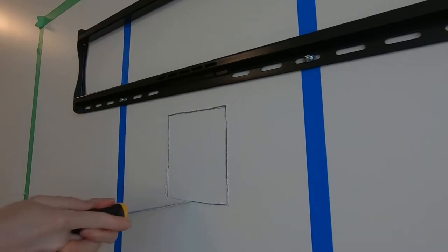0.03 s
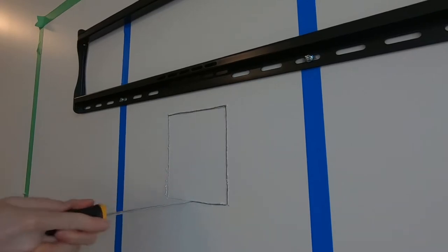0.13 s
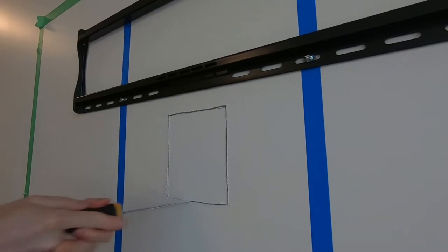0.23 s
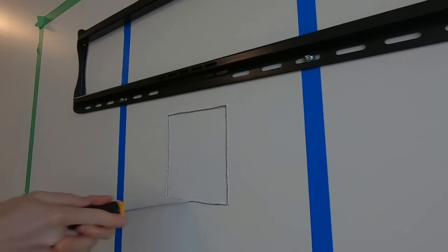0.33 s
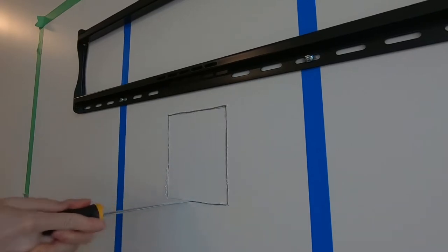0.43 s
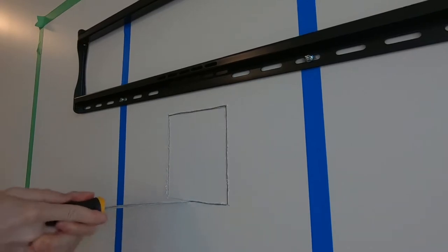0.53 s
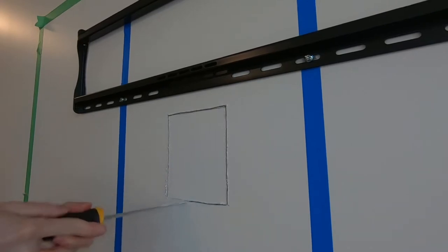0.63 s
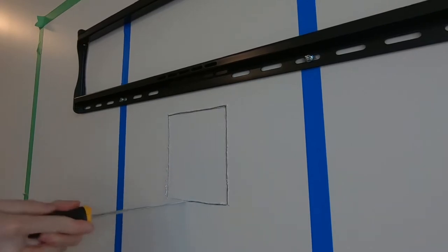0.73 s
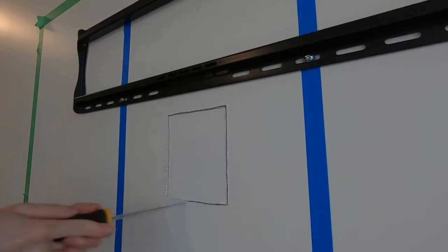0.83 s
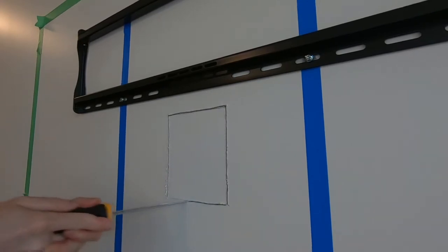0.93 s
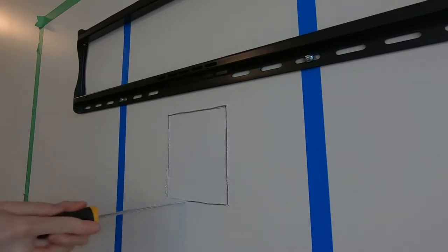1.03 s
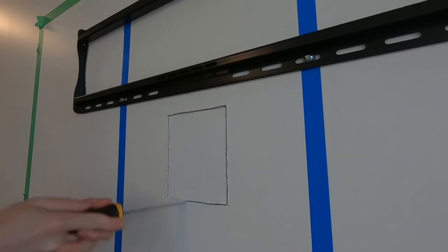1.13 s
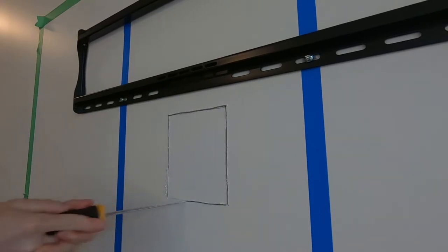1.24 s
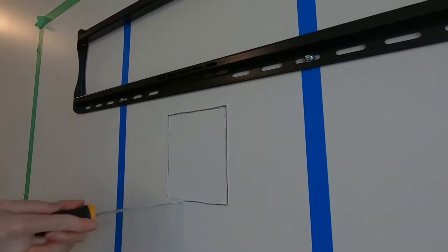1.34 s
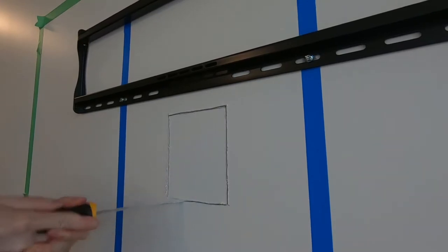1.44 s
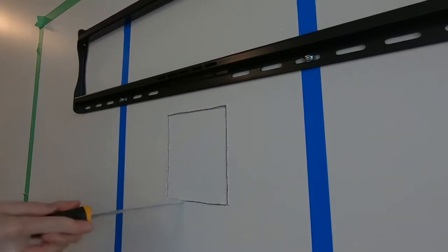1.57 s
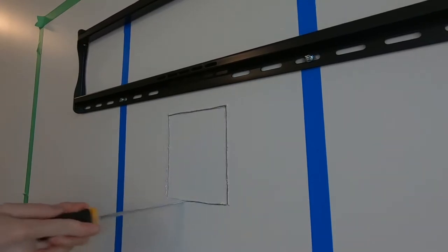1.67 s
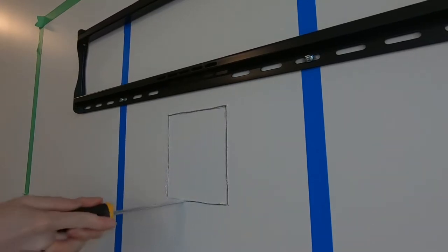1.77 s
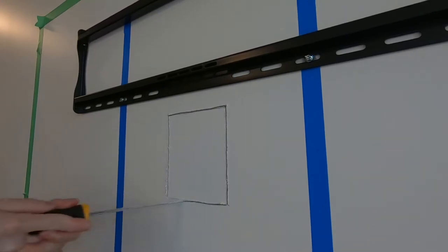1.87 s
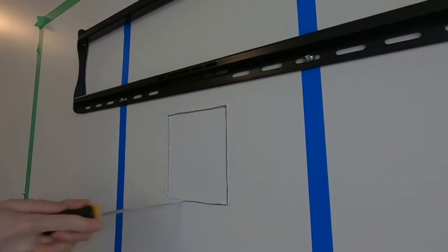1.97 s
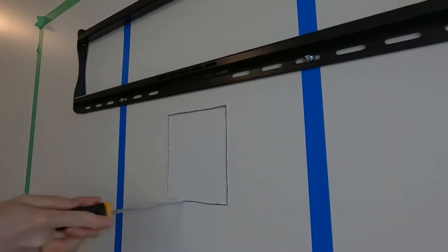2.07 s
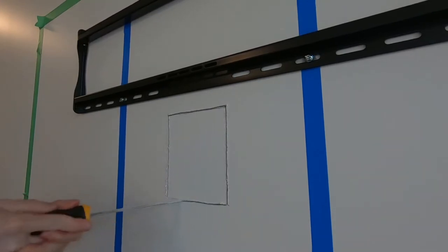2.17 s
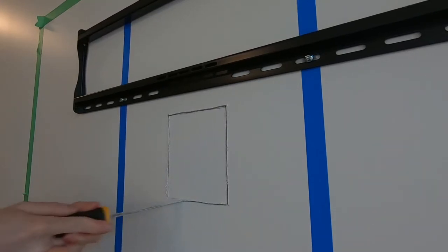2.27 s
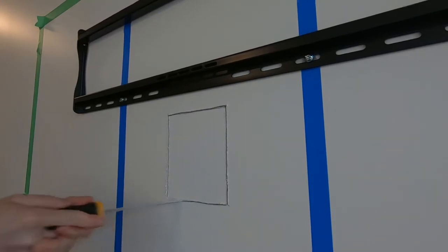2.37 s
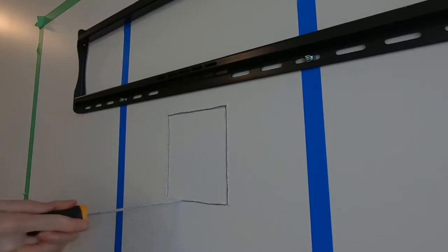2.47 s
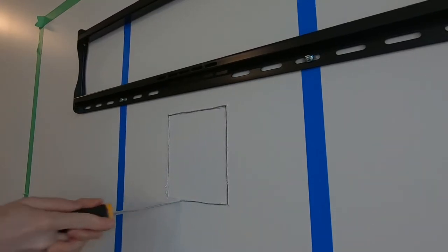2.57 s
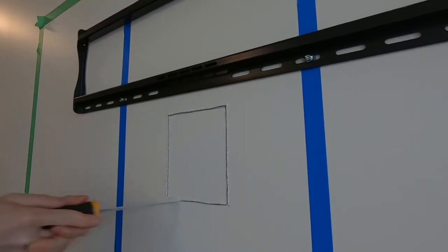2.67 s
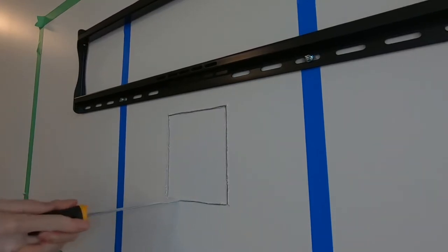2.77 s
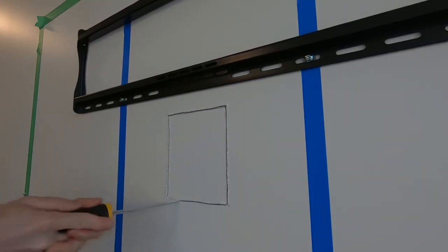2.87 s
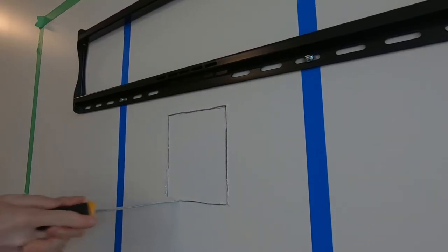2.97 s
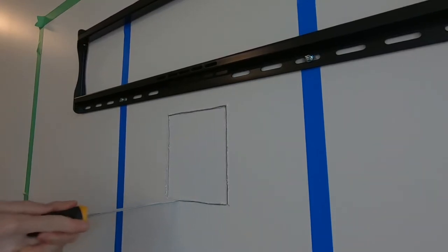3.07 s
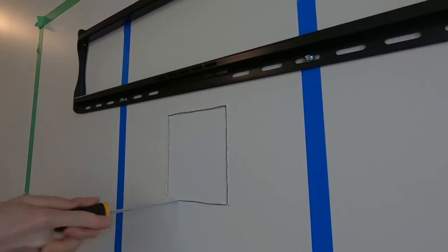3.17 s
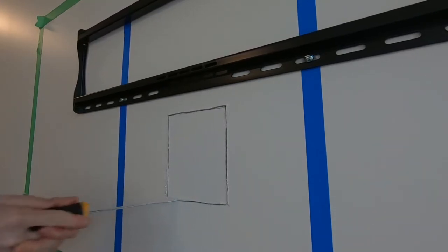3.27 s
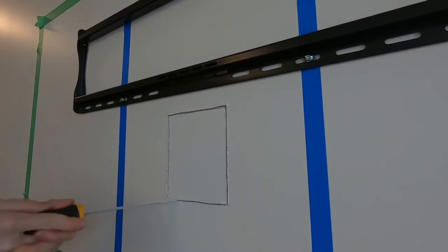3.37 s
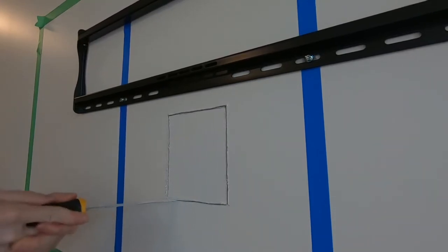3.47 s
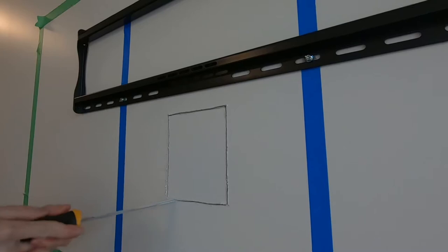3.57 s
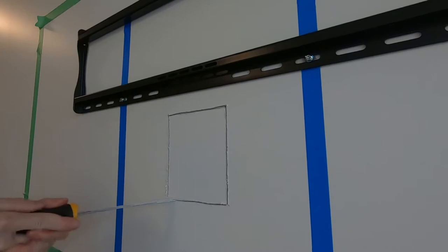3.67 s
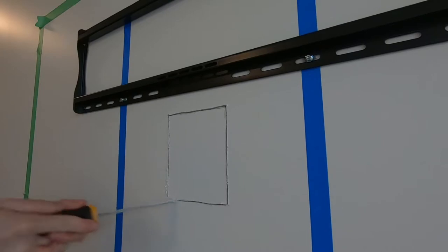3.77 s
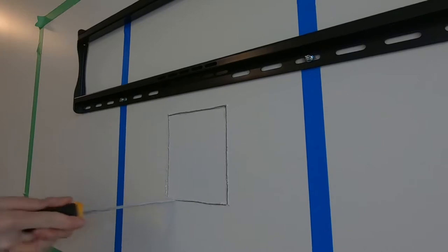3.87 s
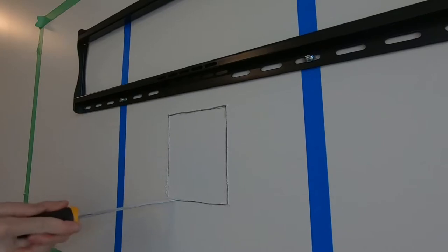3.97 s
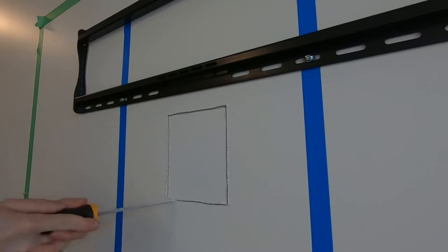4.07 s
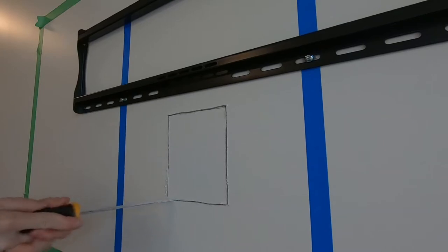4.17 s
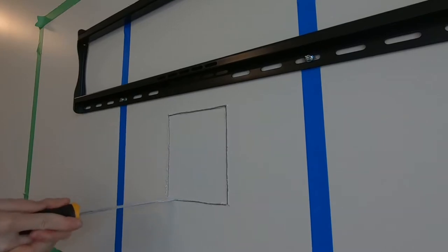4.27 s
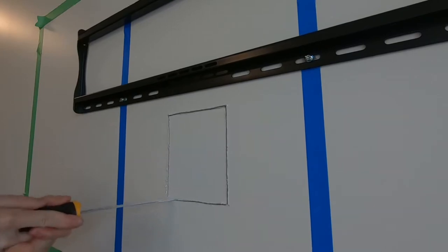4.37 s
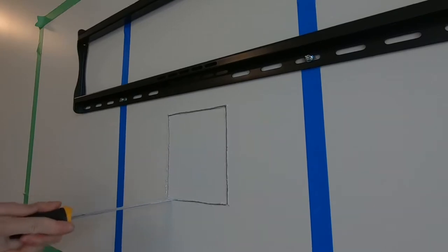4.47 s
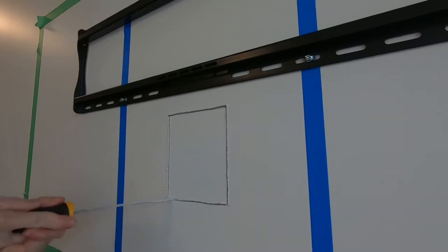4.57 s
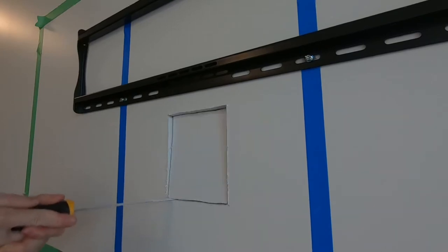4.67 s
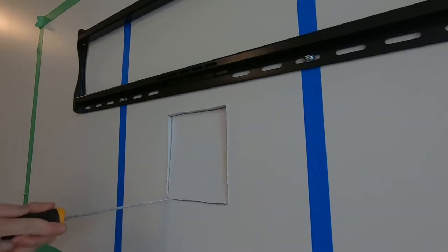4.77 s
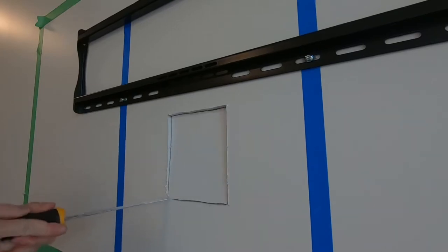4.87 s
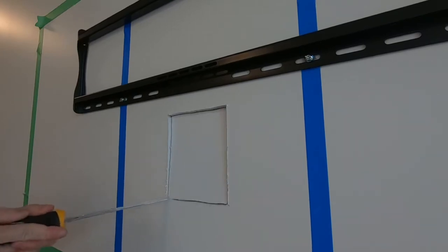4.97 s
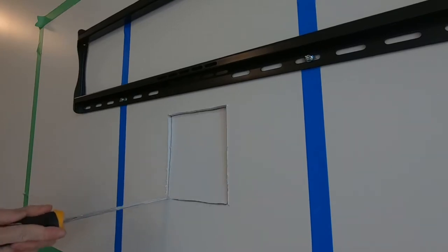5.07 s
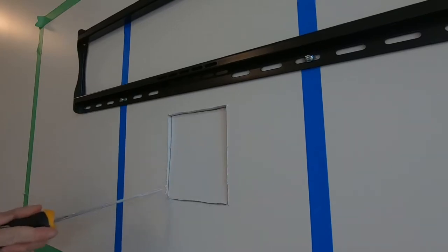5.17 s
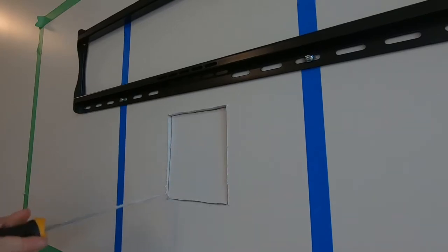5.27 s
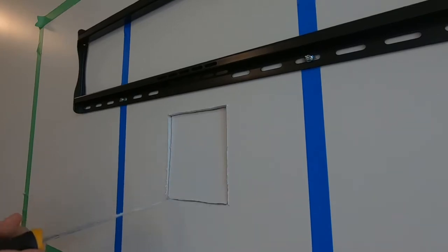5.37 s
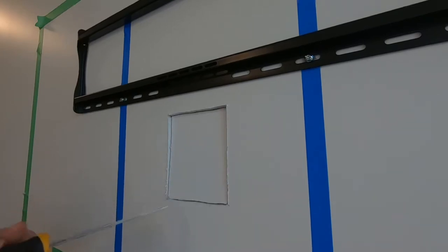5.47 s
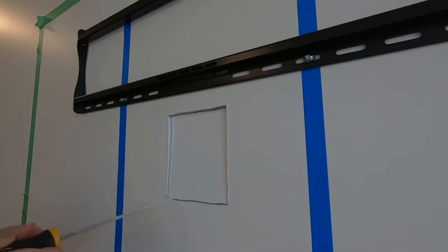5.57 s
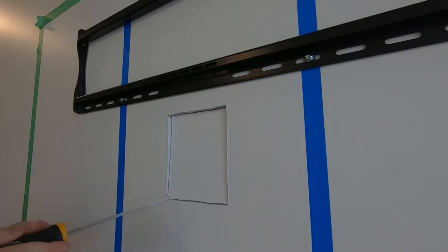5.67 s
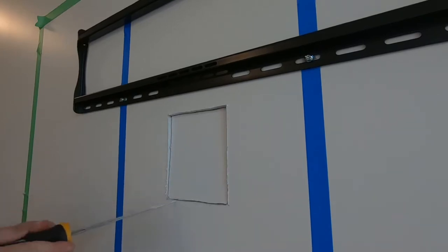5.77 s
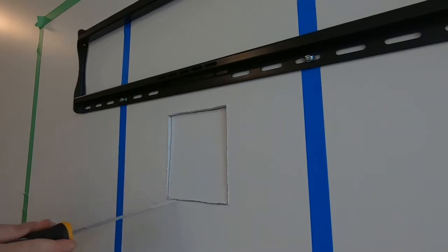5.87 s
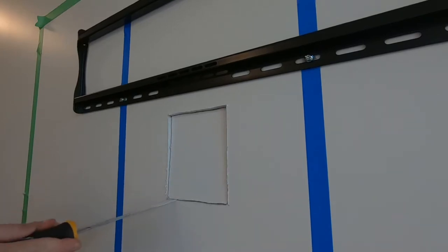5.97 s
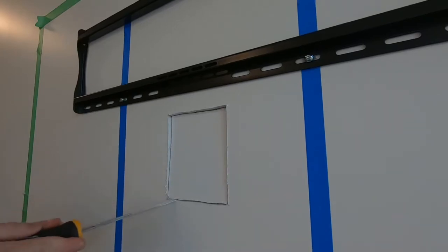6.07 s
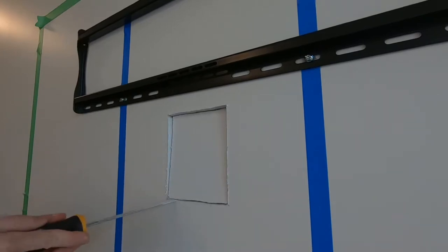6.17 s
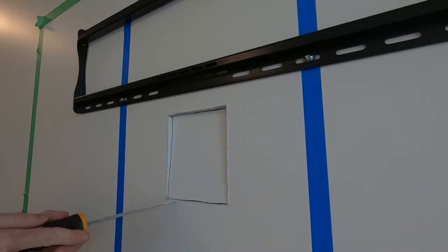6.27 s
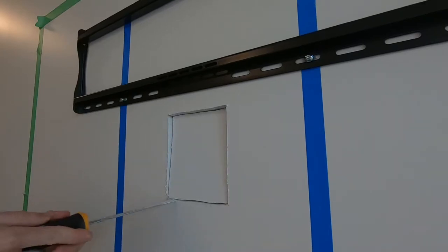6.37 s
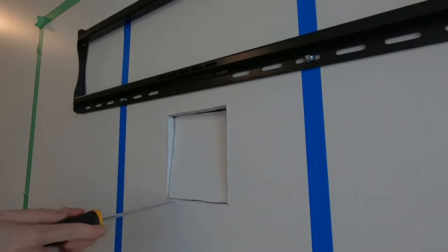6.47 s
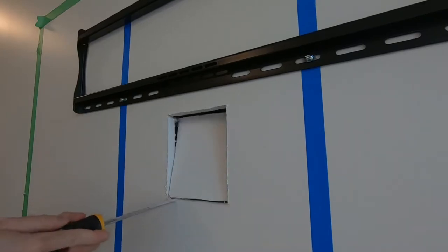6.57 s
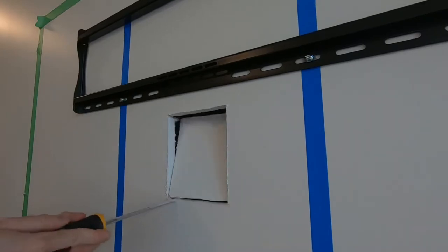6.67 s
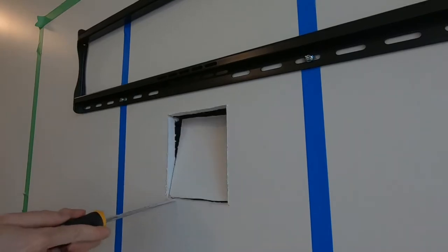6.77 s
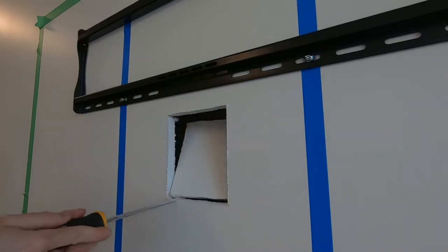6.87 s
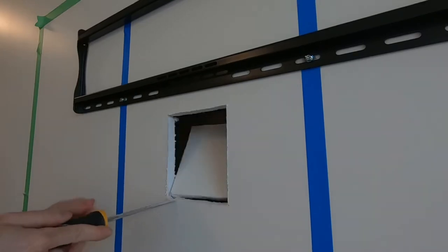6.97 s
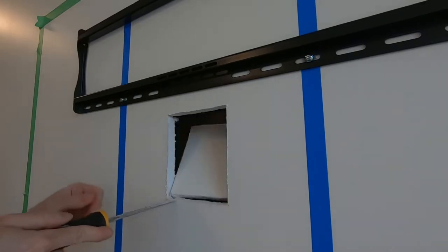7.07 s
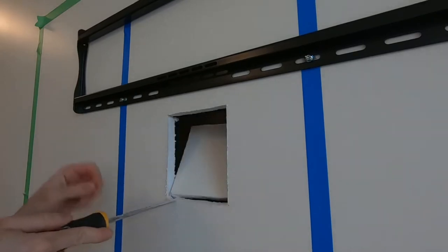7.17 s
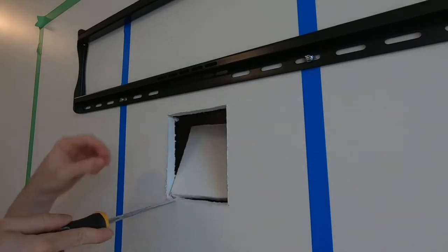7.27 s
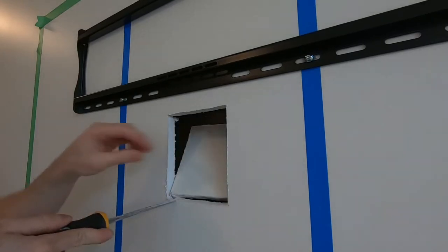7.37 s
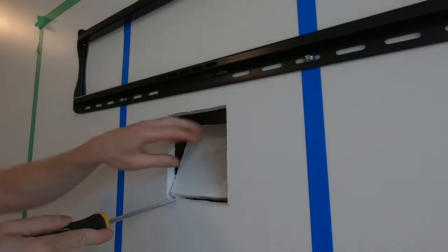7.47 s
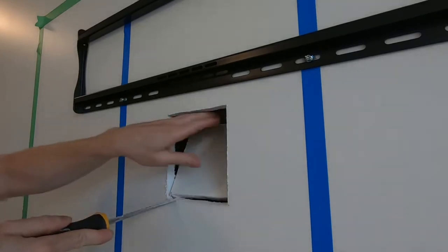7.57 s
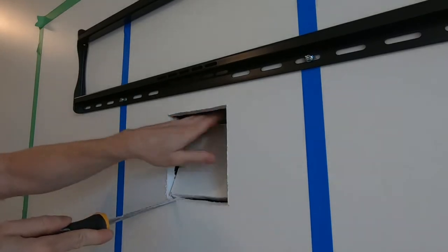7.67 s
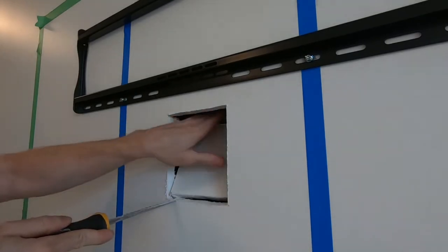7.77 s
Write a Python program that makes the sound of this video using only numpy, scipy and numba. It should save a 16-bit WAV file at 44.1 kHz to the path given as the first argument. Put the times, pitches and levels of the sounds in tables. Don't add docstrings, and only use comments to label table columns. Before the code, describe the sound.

Close up in a bare room, a small hand saw chews through plasterboard in rapid alternating strokes, gritty rasps with low hollow wall thumps and a slight metallic ring. After about four and a half seconds it fades to near quiet. Faint prying scrapes follow, then one harder scrape with a dull knock as the piece gives way, small rubs, and two light finger taps with crumbs over a low hum.

```python
import sys
import numpy as np
from scipy import signal
from scipy.fft import rfft, irfft
from scipy.io import wavfile
from scipy.ndimage import uniform_filter1d
from numba import njit

SR = 44100
rng = np.random.default_rng(int(sys.argv[2]) if len(sys.argv) > 2 else 0)


def wav_out(sig):
    wavfile.write(sys.argv[1], SR, np.round(np.clip(np.atleast_2d(sig).T, -1, 1) * 32767).astype(np.int16))


def elevation(decibels):
    levels = np.asarray(decibels, float)
    return 10 ** (levels / 20)


N = 344421

# (middle [s], length [s], rasp [dB], panel thump [dB], cavity boom [dB])
PUSHES = [(-0.01, .05, -35, -17, -18), (.22, .116, -37.5, -15.5, -21), (.795, .145, -35.5, -22.5, -18),
          (1.073, .127, -33.5, -18, -22), (1.672, .101, -35, -16, -23), (1.965, .109, -32, -18.5, -22),
          (2.24, .134, -35, -21.5, -20), (2.527, .144, -32, -19, -24), (2.818, .133, -32, -20, -23),
          (3.103, .106, -35.5, -19, -25), (3.741, .128, -34.5, -20.5, -26), (4.014, .121, -34.5, -21, -21),
          (4.284, .104, -54, -37, -32)]
PULLS = [(.055, .072, -46, -19, -20), (.347, .122, -40, -20, -27), (.659, .082, -41.5, -23, -20),
         (.936, .104, -42.5, -27, -32), (1.211, .14, -40, -18.5, -28), (1.532, .076, -44, -33, -26),
         (1.826, .132, -38, -21.5, -24), (2.1, .18, -40.5, -20, -45), (2.37, .133, -39.5, -21, -25),
         (2.649, .127, -39.5, -15.5, -35), (2.955, .14, -40.5, -21.5, -24),
         (3.241, .187, -40.5, -20.5, -33), (3.573, .182, -49, -33.5, -34), (3.842, .107, -38.5, -18.5, -27),
         (4.134, .114, -44, -28, -38), (4.446, .1, -48, -30, -31), (4.63, .2, -56, -38, -41),
         (4.701, .078, -45, -37.5, -36), (4.98, .12, -58, -64, -55), (5.12, .3, -72, -80, -75)]
# (middle [s], length [s], rasp [dB], paper re rasp [dB], dust re rasp [dB])
LEVER = [
    (4.928, .05, -53, -6, -4),
    (5.84, .1, -71, -5, -12),
    (5.92, .25, -68, -3, -12),
    (6.033, .13, -56, -7, -19),
    (6.145, .16, -51, -8, -15),
    (6.362, .054, -47, -8, -9.5),
    (6.419, .16, -35.5, -10, -13.5),
    (6.778, .238, -58, -6, -5.5),
    (6.89, .091, -70, 9, 10.5),
    (6.938, .041, -55, -12, -7),
]
# (middle [s], length [s], thump [dB],
# cavity boom [dB])
KNOCKS = [(5.17, .11, -90, -54), (5.84, .25, -53, -61), (6.046, .196, -41.5, -49), (6.156, .17, -38, -48),
          (6.385, .07, -33, -42), (6.44, .22, -20, -29), (6.692, .19, -44, -55), (6.81, .192, -45.5, -43),
          (6.95, .114, -32, -37), (7.049, .13, -42, -52), (7.46, .17, -61, -74)]
# (time [s], peak [dB], thud re peak [dB], crack centre [Hz])
TICKS = [
    (1.506, -36, -5, 3500),
    (1.9405, -24, 4, 3300),
    (4.917, -44, -9, 4500),
    (5.8225, -54, 3, 3400),
    (5.857, -60, -3, 3300),
    (6.031, -44, 5, 2600),
    (6.357, -36, 6, 4700),
    (6.936, -42, 14, 4200),
    (7.5196, -39, -9, 5000),
    (7.5336, -33, -9, 5200),
]
# (middle [s], length [s], level [dB])
CRUMBS = [
    (7.525, .02, -58),
]

# (centre [Hz], width [Hz], level [dB])
CAVITY = [(22, 5.9, -11.5), (36, 34, -1), (50.6, 9.7, 2.5), (72.7, 7.7, -2.5)]
PANEL = [(97.8, 6.9, -5.5), (132, 30, -1.5), (160.2, 21.3, 1.5), (206.8, 75, -5), (270.4, 42.5, -11.5),
         (304.5, 32, -17.5)]
LOOSE_PIECE = [(98, 18, -3.5), (135, 25, 0.5), (166, 24.4, -0.5), (215, 30, -3.5), (274, 19, -7)]
BOARD = [(278.7, 40, 0.5), (362.4, 52, -4), (457.6, 26.5, -5), (528.2, 30, -9.5), (636, 71, -9),
         (732, 67, -17.5)]
BLADE_IN_CUT = [(1259, 49, 1.5), (1535, 31, -3.5), (1754, 30, -4.5), (1877, 180, 2), (2320, 46, -0.5),
                (2497, 35, 0.5), (2736, 45, -3.5), (2920, 66, -1.5), (4640, 90, -14), (5050, 60, -15.5),
                (5680, 110, -6), (6530, 90, -20.5), (8670, 110, -18.5)]
BLADE_FREE = [(1530, 50, 2), (1860, 90, 0), (2251, 65, -0.5), (2560, 60, 1), (3064, 32, -1.5),
              (3910, 50, -2.5), (4713, 70, 5), (5460, 80, -8), (6260, 60, -14), (7100, 60, -11)]
PAPER = [(2950, 400, -2.5), (3350, 450, -0.94), (3896, 370, -2.5)]
KERF = [(1900, 120, 4.5)]
# (frequency [Hz], density [dB per Hz])
RASP = [(410, -37), (700, -3), (868, -1), (1120, -3.5), (1270, 0), (1620, -1.5), (1840, -4), (2060, 0),
        (3760, -6), (4360, -11), (5500, -20.5), (7150, -44.5), (12100, -120)]
DUST = [(3500, -29.5), (4400, -4), (5300, -5.5), (5900, -7), (7600, -9), (9000, -8), (10300, -15.5),
        (11500, -29), (14900, -30), (20000, -90)]
CRUMB = [(600, -14), (1500, -5.5), (1660, -18), (2380, -6), (3340, -16), (3580, -7.5), (7250, -2),
         (11500, -24), (14900, -54), (22000, -120)]
HOUSE = [(12, -29.5), (20, 3.5), (44, -1), (86, -11.5), (125, -9.5), (207, -12.5), (271, -18), (540, -31.5),
         (784, -18), (1050, -30), (1440, -29), (8580, -45.5), (11500, -57), (14900, -87), (22000, -120)]
# (centre [Hz], width [Hz], level before load change [dB], level after [dB])
HUM = [(54, 2.5, -67, -78), (108, 3.5, -67, -84), (185, 70, -88, -69), (280, 24, -84, -68)]
# (frequency [Hz], side re mid [dB])
APART = [(60, -41.5), (110, -35.5), (190, -48), (340, -15.5), (610, -4), (1090, -2.5), (1940, -4.5),
         (3460, -9.5), (6180, 0.5), (11000, 4.5)]

# (lag [s], stretch of length [ratio], after-ring [dB], after-ring fade [dB/s])
AS_RASP = (.001, 1.01, -1.5, 57)
AS_TEAR = (.001, 1.05, -10, 55)
AS_DUST = (.004, 1.12, -5, 62)
AS_THUMP = (.018, 1.45, -6, 60)
AS_BOOM = (.041, 2.3, -8, 42)
LEVER_RASP = (.001, 1.01, -6.5, 58)
LEVER_DUST = (.001, 1.01, -4, 95)
KNOCK_THUMP = (.001, 1.01, -15.5, 80)
KNOCK_BOOM = (.019, 1.3, -4, 130)
CRUMBS_FALL = (.001, 1.01, 8, 70)

RISE_SHARE, LEVER_RISE_SHARE = .44, .33
TEETH_SLOW_HZ, TEETH_FAST_HZ = 108, 138
PUSH_TOP_HZ = 1800
TEAR_PUSH_DB, TEAR_PULL_DB, DUST_PUSH_DB, DUST_PULL_DB = -8, 4.5, -14, -11.3
CLOGGED_DB, CLEARS_S = -5.5, 1.1
SAGS_S, BRUSH_TEAR_DB, BRUSH_DUST_DB = 4.6, 3.5, 4.5
LOOSE_S = 5.6
ROOM_T60_S, ROOM_DAMP, ROOM_DB = 0.59, 0.4, -13.5
HOUSE_DB, HUM_CHANGE_S = -59, 6.2
PORTS_DB = -39


def sawing():
    rows = np.array(PUSHES + PULLS)
    mid_s, _, rasp_db, thump_db, boom_db = rows.T
    pull = np.arange(len(rows)) >= len(PUSHES)
    brush = mid_s > SAGS_S
    tear_db = np.where(pull, TEAR_PULL_DB, TEAR_PUSH_DB) + BRUSH_TEAR_DB * brush
    dust_db = np.where(pull, DUST_PULL_DB, DUST_PUSH_DB) + BRUSH_DUST_DB * brush
    dust_db = dust_db + CLOGGED_DB * np.exp(-mid_s / CLEARS_S)

    def follow(db, law):
        return swell(rows, db, RISE_SHARE, law)

    speed = np.minimum(elevation(2 * follow(0 * mid_s, AS_THUMP)), 1)
    teeth_hz = TEETH_SLOW_HZ + (TEETH_FAST_HZ - TEETH_SLOW_HZ) * speed
    return (follow(rasp_db, AS_RASP), follow(rasp_db + tear_db, AS_TEAR), follow(rasp_db + dust_db, AS_DUST),
            follow(thump_db, AS_THUMP), follow(boom_db, AS_BOOM), teeth_hz)


def teeth(teeth_hz):
    phase = np.cumsum(teeth_hz * (1 + .1 * walk(120)) / SR)
    tooth = phase.astype(int)
    bite = elevation(3.47 * rng.standard_normal(N)[tooth])
    push = heard(bite * np.diff(tooth, prepend=0)) + .5 * rng.standard_normal(N)
    push = signal.sosfilt(signal.butter(2, PUSH_TOP_HZ, fs=SR, output="sos"), push)
    gate = 1.0 + np.minimum(bite, 1.7) * np.exp(-(phase % 1) / 0.51)
    return push, gate


def saw(rasp_db, tear_db, dust_db, blade, gate, blade_db):
    burst = gate * (rng.standard_normal(N) + .35 * heard(grains(2500, spread_db=3.0)))
    chatter = gate * rng.standard_normal(N) * elevation(1.15 * rasp_db)
    steel = np.zeros(N)
    for hz, width, db in blade:
        mode = ring(chatter * elevation(3.5 * walk(14)), [(hz, width, db)])
        steel += ring(mode, [(hz, 5 * width, 0)]) * np.sqrt(width)
    rasp = colour(burst * elevation(rasp_db + 2.0 * walk(40)), RASP)
    rasp = rasp + ring(rasp, KERF) * np.sqrt(KERF[0][1])
    tear = np.zeros(N)
    for k, mode in enumerate(PAPER):
        tear += (-1) ** k * ring(np.roll(burst, 900) * elevation(tear_db + 3.5 * walk(9)), [mode])
    tear = ring(tear, PAPER)
    dust = colour(burst * elevation(dust_db), DUST)
    return (layer(rasp, rasp_db - 1.5) + layer(steel, rasp_db + blade_db)
            + layer(tear, tear_db - 7) + layer(dust, dust_db))


def wall(push, rasp_db, panel_db, cavity_db):
    loose = np.arange(N) > LOOSE_S * SR
    panel = np.zeros(N)
    for modes, db in ((PANEL, panel_db - 100 * loose), (LOOSE_PIECE, panel_db - 100 * ~loose)):
        panel += layer(ring(push * elevation(db), modes), db)
    board_db = 0.84 * rasp_db + 0.23 * panel_db - 2.2 * loose
    board = elevation(3.2) * layer(ring(push * elevation(board_db), BOARD), board_db)
    boom = ring((push + rng.standard_normal(N)) * elevation(cavity_db), CAVITY)
    return panel + board, layer(boom, cavity_db)


def levering():
    rows, knocks = np.array(LEVER), np.array(KNOCKS)
    _, _, rasp_db, paper_db, dust_db = rows.T

    def follow(table, db, law):
        return swell(table, db, LEVER_RISE_SHARE, law)

    return (follow(rows, rasp_db, LEVER_RASP), follow(rows, rasp_db + paper_db, LEVER_DUST),
            follow(rows, rasp_db + dust_db, LEVER_DUST), follow(knocks, knocks[:, 2], KNOCK_THUMP),
            follow(knocks, knocks[:, 3], KNOCK_BOOM))


def ticks():
    cracks, thud = np.zeros(N), np.zeros(N)
    shape = rng.standard_normal((len(TICKS), 400)) * np.exp(-np.arange(400) / SR / 0.00086)
    shape[:, 0] = 5
    for (s, db, thud_db, hz), burst in zip(TICKS, shape):
        i = int(s * SR)
        band = signal.butter(3, [.6 * hz, min(1.2 * hz, 9000)], "band", fs=SR, output="sos")
        crack = signal.sosfilt(band, burst)
        cracks[i:i + 400] += elevation(db) * crack / np.abs(crack).max()
        thud[i] += elevation(db + thud_db) * (thud_db > 0)
    unit = np.abs(ring(np.eye(1, 4000)[0], PANEL)).max()
    return cracks + elevation(-7) * ring(thud, PANEL) / unit


def crumbs():
    fall = .4 * heard(grains(1500, spread_db=2.0)) + rng.standard_normal(N)
    return heard(colour(fall, CRUMB)) * elevation(swell(CRUMBS, [CRUMBS[0][2]], .3, CRUMBS_FALL))


@njit
def walls(x, lags, gain, damp):
    line, soft, out = np.zeros((8, 4096)), np.zeros(8), np.zeros((2, len(x)))
    for i in range(len(x)):
        total = 0.
        for k in range(8):
            soft[k] += (1 - damp) * (gain[k] * line[k, (i - lags[k]) & 4095] - soft[k])
            total += soft[k]
            out[k % 2, i] += soft[k]
        for k in range(8):
            line[k, i & 4095] = x[i] + soft[k] - total / 4
    return out


def house():
    after = np.clip((np.arange(N) / SR - HUM_CHANGE_S) / .3, 0, 1)

    def distant():
        level_db = HOUSE_DB - 7.5 + 2.9 * after + 1.3 * walk(3.95)
        return heard(colour(rng.standard_normal(N), HOUSE)) * elevation(level_db)

    rumble, other = distant(), distant()
    hum = np.zeros(N)
    for hz, width, db, late_db in HUM:
        tone = ring(ring(rng.standard_normal(N), [(hz, 5 * width, 0)]), [(hz, width, 0)])
        hum += elevation(db + (late_db - db) * after) * heard(tone)
    return np.array([rumble + hum, other])


def swell(rows, db, rise, law):
    lag_s, stretch, ring_db, fade_db_s = law
    power = np.zeros(N)
    for (s, length, *_), peak_db in zip(rows, db):
        span = length * stretch
        i = np.arange(max(int((s - 2 * span) * SR), 0), min(int((s + 2 * span) * SR), N))
        t = i / SR - s - lag_s
        side_s = np.where(t < 0, rise, 1 - rise) * span
        power[i] += elevation(2 * peak_db) * np.exp(-(2 * t / side_s) ** 2)
    keep = elevation(-2 * fade_db_s / SR)
    after = signal.lfilter([1 - keep], [1, -keep], power, zi=[power[0]])[0]
    return 10 * np.log10(power + elevation(2 * ring_db) * after + 1e-12)


def heard(x):
    return x / np.sqrt(np.mean(x ** 2) + 1e-18)


def layer(x, db):
    return heard(x) * np.sqrt(np.mean(elevation(db) ** 2))


def colour(x, points):
    hz, db = np.transpose(points)
    size = 4096
    bins_hz = np.arange(size // 2 + 1) * SR / size
    cep = irfft(np.interp(np.log(bins_hz + 1), np.log(hz), db) * np.log(10) / 20)
    cep[1:size // 2] *= 2
    cep[size // 2 + 1:] = 0
    return signal.fftconvolve(x, irfft(np.exp(rfft(cep))))[:N]


def ring(x, modes):
    out = np.zeros(len(x))
    for k, (hz, width, db) in enumerate(modes):
        mode = signal.lfilter(*signal.iirpeak(hz, hz / width, SR), x)
        out += (-1) ** k * elevation(db) * mode / np.sqrt(width)
    return out


def grains(rate_hz, spread_db):
    chance = rng.random((3, N))
    size = elevation(-spread_db * np.log(chance[2] + .004))
    return (chance[0] < rate_hz / SR) * np.sign(chance[1] - .5) * size


def walk(rate_hz):
    k = int(SR / rate_hz)
    steps = np.repeat(rng.standard_normal(N)[:N // k + 1], k)[:N]
    return heard(uniform_filter1d(uniform_filter1d(steps, k), k))


def scene():
    *cut, teeth_hz = sawing()
    pry = levering()
    rasp_db, _, _, panel_db, cavity_db = np.maximum(cut, pry)
    push, gate = teeth(teeth_hz)
    thump, boom = wall(push, rasp_db, panel_db, cavity_db)
    blade = saw(*cut[:3], BLADE_IN_CUT, gate, blade_db=-4) + saw(*pry[:3], BLADE_FREE, gate, blade_db=-2.5)
    near = blade + thump + ticks() + crumbs() + 1e-18
    scatter = rng.standard_normal(1500) * np.exp(-np.arange(1500) / SR / 0.012)
    spread = signal.fftconvolve(near - 0.52 * thump, scatter / np.linalg.norm(scatter))[:N]
    lags = np.array([673, 881, 1093, 1301, 1559, 1831, 2141, 2473])
    room = elevation(ROOM_DB) * walls(spread, lags, elevation(-60 * lags / SR / ROOM_T60_S), ROOM_DAMP)
    hum, other = house()
    mid = near + boom + room[0] + hum
    side = colour(elevation(4) * room[1] + elevation(-4.5) * spread + other, APART)
    side = side + elevation(PORTS_DB) * np.roll(boom + thump, 150)
    return np.array([mid + side, mid - side])


def band_limit(x):
    return signal.sosfilt(signal.butter(12, 14800, fs=SR, output="sos"), x)


def record(dry):
    dull = signal.sosfilt(signal.butter(3, 10500, fs=SR, output="sos"), dry)
    mix = np.tanh(1.792 * dull) / 1.807
    return band_limit(mix)


dry = scene()
out = record(dry)
wav_out(out)
```